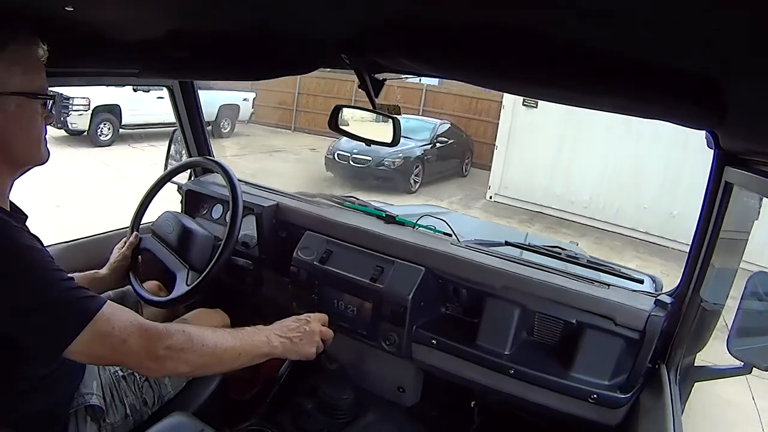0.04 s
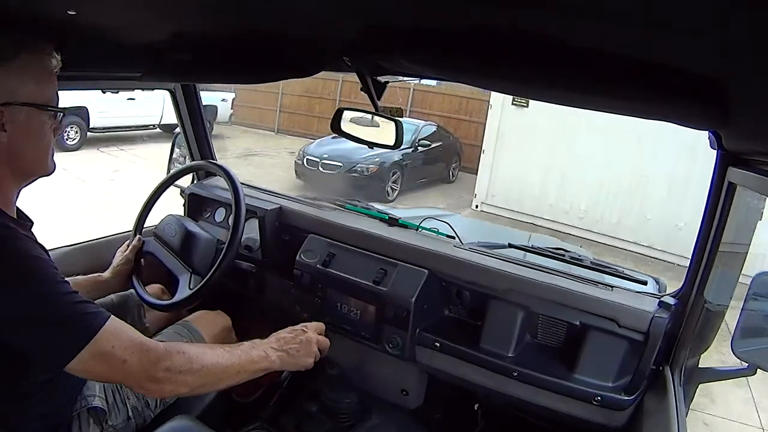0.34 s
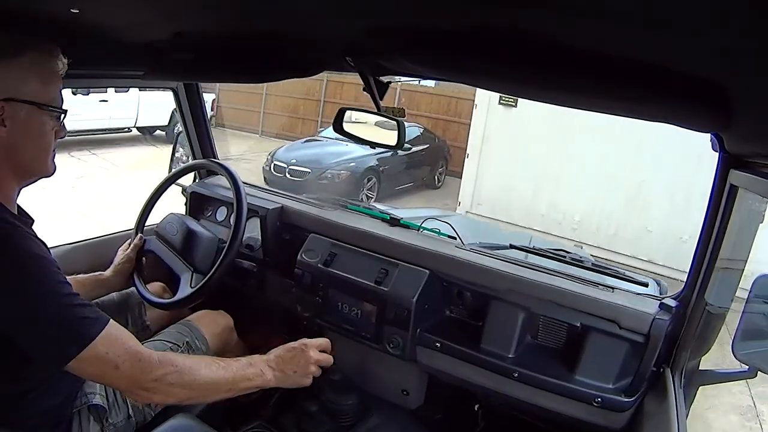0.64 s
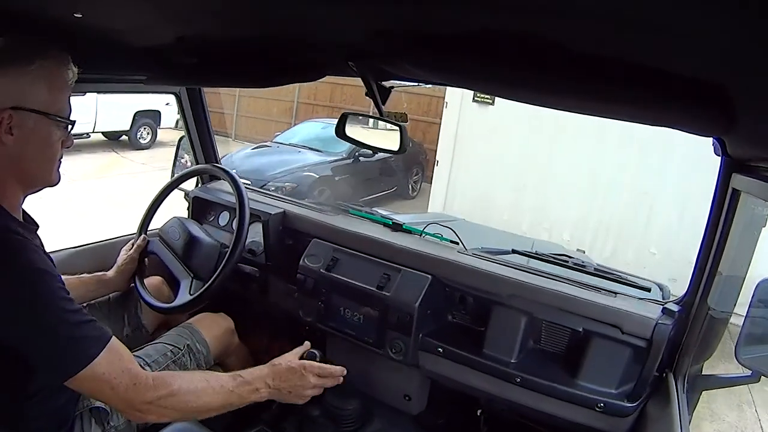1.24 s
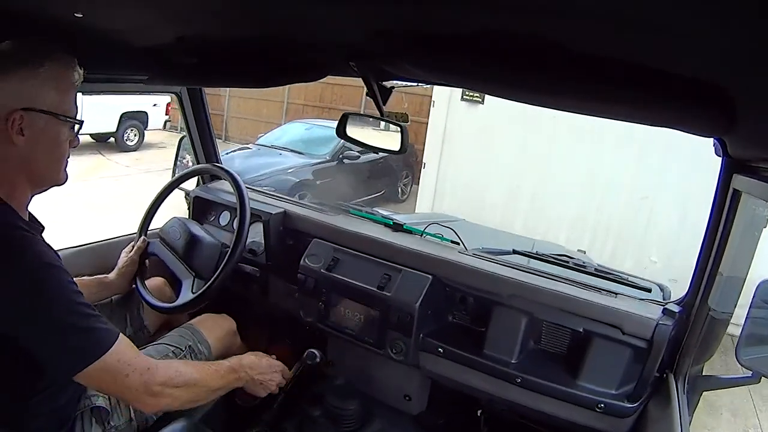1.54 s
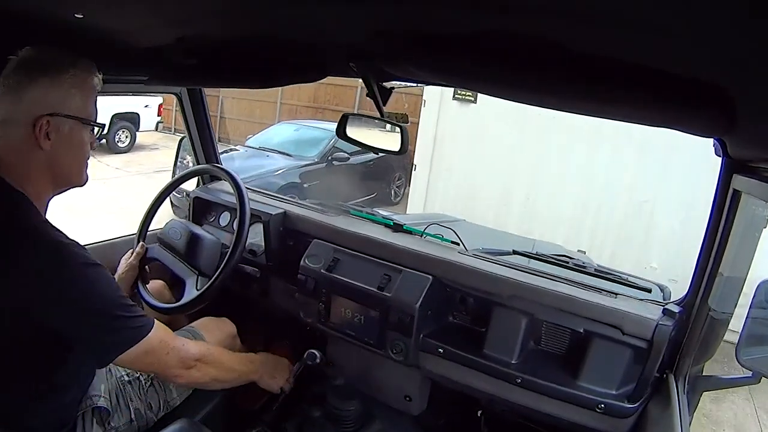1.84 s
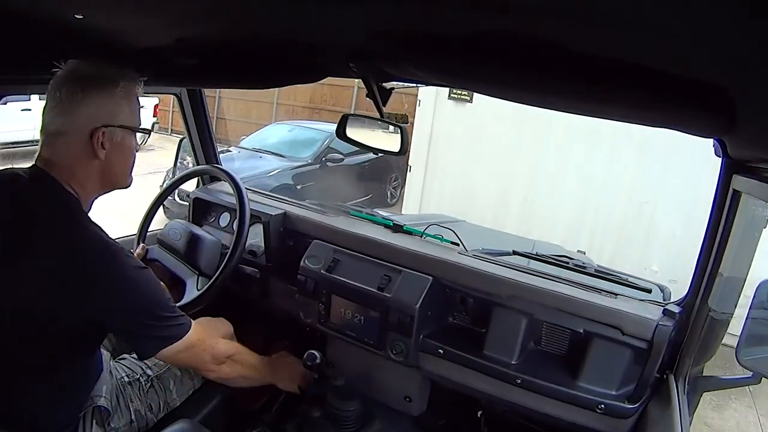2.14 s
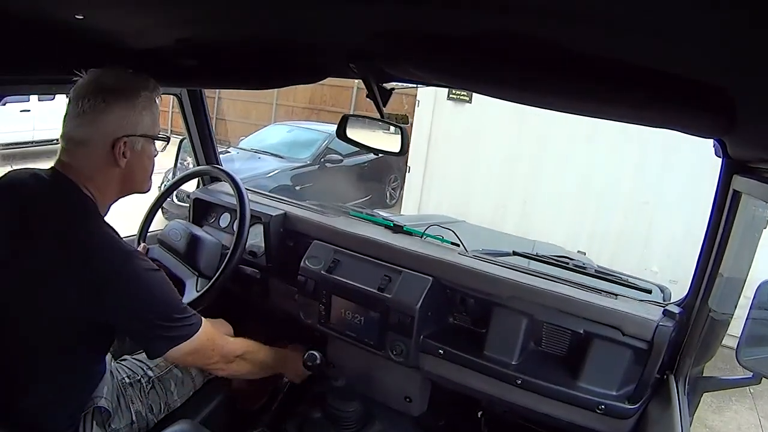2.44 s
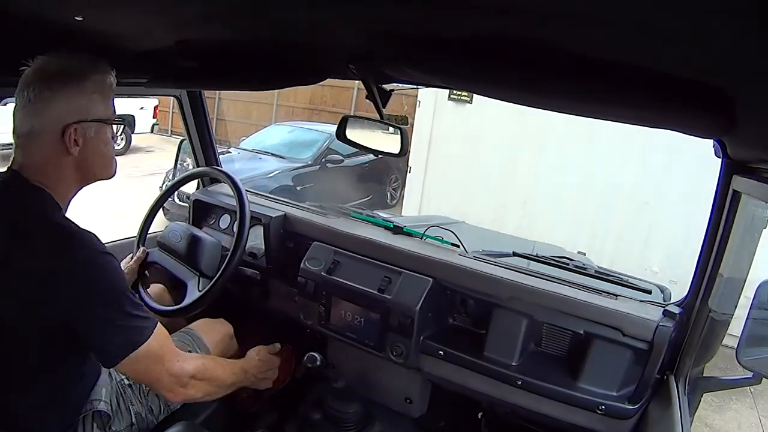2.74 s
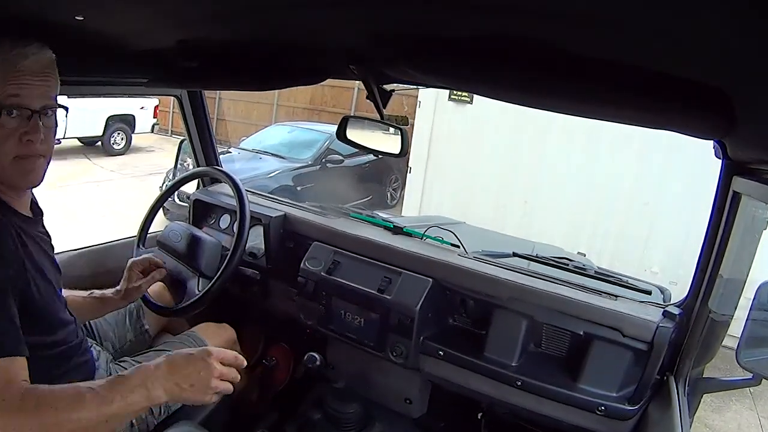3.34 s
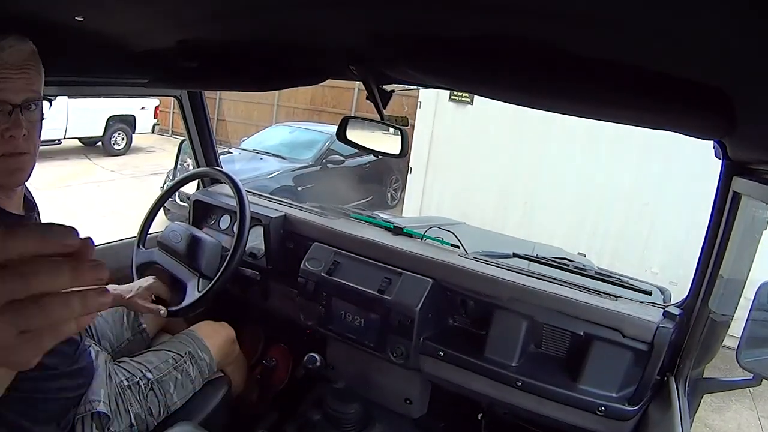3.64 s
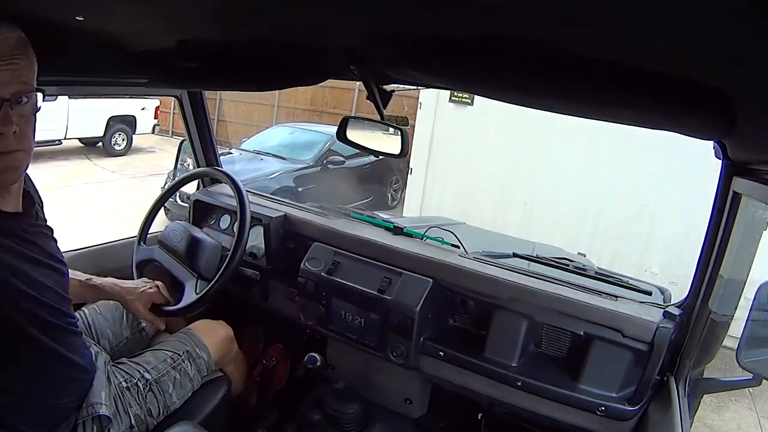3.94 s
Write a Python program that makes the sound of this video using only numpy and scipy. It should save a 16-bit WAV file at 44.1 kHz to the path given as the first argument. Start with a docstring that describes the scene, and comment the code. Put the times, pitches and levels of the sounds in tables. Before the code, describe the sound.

A parking brake ratchets quickly inside a vehicle, after rattling to a stop, engine idling.

```python
"""Inside an off-road vehicle rolling to a stop. First the body rumbles and loose parts rattle, with one
firm clunk at about 0.55 s. As the rumble dies down, the engine's throbbing idle is left over a hiss.
At 2.5 s the parking brake is pulled: the cable scrapes tight and the pawl snaps over six teeth,
ringing the lever and thumping the floor of the small cabin. The idle carries on to the end."""
import sys
import numpy as np
from scipy import signal
from scipy.fft import rfft, irfft
from scipy.io import wavfile
from scipy.ndimage import uniform_filter1d

SR = 44100
rng = np.random.default_rng(int(sys.argv[2]) if len(sys.argv) > 2 else 0)


def digitize_waveform(pressure):
    """Quantize a signal to 16-bit integers and store it at the path in sys.argv[1].

    Rows of a 2-D input are taken as channels; values are limited to [-1, 1].
    """
    field = np.atleast_2d(pressure).T
    bounded = np.clip(field, -1, 1)
    quanta = np.round(bounded * 32767).astype(np.int16)
    wavfile.write(sys.argv[1], SR, quanta)


N = 176400  # 4 s

# one click per ratchet tooth: t/s, steel level/dB, snap trim/dB, floor level/dB
TOOTH_CLICKS = [(2.5508, -1, -1, 2.5), (2.593, 2, -3, 2.5), (2.6318, 1.5, -2, -4), (2.6624, 0.5, -0.5, 0),
                (2.6891, 0, 0, 4), (2.7226, -2.5, 4.5, 4)]
# bright ring of the lever and ratchet plate: f/Hz, level/dB, t60/s
LEVER_MODES = [(1531, 3, 0.037), (1660, 0, 0.026), (1846, -0.5, 0.039), (2000, -9, 0.026),
               (2730, -21, 0.049), (2724, -10.5, 0.059), (3030, -3.5, 0.056), (3240, -3, 0.036),
               (3510, -23, 0.046), (5050, -27, .035), (5700, -22, .04), (6910, -14.5, 0.072),
               (9640, -21.5, 0.029)]
# low ring of the floor bracket: f/Hz, level/dB, t60/s
BRACKET_MODES = [(207, 1, 0.093), (253.6, 1.5, 0.23), (476, -17, 1), (503, -5.5, 0.2), (644, -1, 0.078),
                 (871, -5.5, 0.1)]
# crisp snap of the pawl: f/Hz, level/dB
SNAP_EQ = [(300, -9.5), (750, -7.5), (1150, -10.5), (1600, -0.5), (2400, -5.5), (3100, -0.5), (4000, -13),
           (5000, -5), (6500, -11.5), (8300, -11.5), (9700, -7), (11000, -14)]
# deep thump of the floor, also the boom under the knocks: f/Hz, level/dB
THUMP_EQ = [(30, -5), (70, -12), (120, 12.5), (260, 1.5), (380, -14.5), (700, -6), (1500, -51), (6000, -87)]
LEVER_DB, SNAP_DB, THUMP_DB, BRACKET_DB = -31.5, -33, -39, -45.5
DRAG_LEAD_S, DRAG_DB, REBOUND_LAG_S, REBOUND_DB = 0.0021, -17.5, 0.009, -11
FLOOR_LAG_S, SEAT_LAG_S, SEAT_DB = 0.00715, 0.028, -1


def ratchet():
    """The pawl drags over each crest, snaps down and rebounds; the floor answers just after."""
    steel, floor = np.zeros((2, 2, N))
    lever_phases, bracket_phases = rng.random(len(LEVER_MODES)), rng.random(len(BRACKET_MODES))
    for at, steel_db, snap_db, floor_db in TOOTH_CLICKS:
        for lag, hit_db in ((-DRAG_LEAD_S, DRAG_DB), (0, 0), (REBOUND_LAG_S, REBOUND_DB)):
            snap = amp(SNAP_DB + snap_db) * burst(SNAP_EQ, t60=0.054, attack=0.00026, width_db=-1)
            lever = amp(LEVER_DB) * ring(LEVER_MODES, lever_phases)
            add(steel, at + lag, amp(steel_db + hit_db) * (snap + lever))
        thump = amp(THUMP_DB + floor_db) * burst(THUMP_EQ, t60=0.11, attack=0.0042, width_db=0.5)
        bracket = amp(BRACKET_DB + floor_db) * ring(BRACKET_MODES, bracket_phases)
        add(floor, at + FLOOR_LAG_S, thump + bracket)
    # the bracket rings again as the pawl seats in the last tooth
    seated_at = TOOTH_CLICKS[-1][0] + SEAT_LAG_S
    add(floor, seated_at, amp(BRACKET_DB + SEAT_DB) * ring(BRACKET_MODES, bracket_phases))
    return cabin_reflections(steel) + floor


# swell and fade as the lever takes up the cable: t/s, level/dB
PULL_ENVELOPE = [(2.5, -82.5), (2.525, -57), (2.56, -51), (2.73, -53.5), (2.765, -64), (2.83, -71),
                 (2.9, -92)]
# midrange scrape of the cable: f/Hz, level/dB
CABLE_EQ = [(150, -13), (400, -2), (750, -2.5), (1100, -4), (1600, 0), (2400, -5), (5000, -34),
            (11000, -12)]


def brake_cable():
    """The brake cable scrapes unevenly as it tightens."""
    return noise(CABLE_EQ, size=N) * amp(curve(PULL_ENVELOPE) + 2.6 * wander(rate_hz=90))


# clunks and rattles: t/s, level/dB, clink trim/dB, boom trim/dB, attack/s
BODY_HITS = [(.003, -15.5, 1, 14.5, 0.0046), (.143, -12, 9, 12, 0.0092), (.198, -13, 1, 13.5, 0.0084),
             (.28, -16, 7, 9, 0.017), (.345, -13, 10, 11, 0.015), (.554, -3, 4.5, 3, 0.0024),
             (.565, 2, -10, 0, .002), (0.587, -12, 1, 16.5, 0.0016), (1.06, -12, 6.5, -3.5, 0.01),
             (1.09, -9.5, 1, 8.5, 0.01), (1.16, -10.5, -3, 5, 0.0056), (1.233, -16, 4, 9, 0.0081),
             (2.447, -26, 13, 4, 0.0018), (2.508, -14.5, -2, -10, 0.0016)]
# dull note of a panel: f/Hz, level/dB
PANEL_EQ = [(100, -18), (300, -16), (480, -5), (690, 6.5), (830, 5.5), (1100, -16), (1600, -21),
            (3000, -20), (6000, -57), (11000, -60)]
# metallic clink on top: f/Hz, level/dB
CLINK_EQ = [(300, -36), (1100, -19), (1550, 7.5), (2100, -9.5), (3000, -8), (4000, -23), (5200, -9.5),
            (7000, -31), (11000, -40)]
PANEL_DB, CLINK_DB, BOOM_DB = -34.5, -38.5, -36
DULL_ABOVE_HZ, DULL_PER_OCTAVE = 1460, 0.66  # dB of treble lost per octave for each dB less force


def body_knocks():
    """Loose parts knock: a panel note, a boom of the body and a clink that is duller for weak blows."""
    out = np.zeros((2, N))
    for at, db, clink_db, boom_db, attack in BODY_HITS:
        tilt = DULL_PER_OCTAVE * db
        tilted_eq = [(hz, level + tilt * max(np.log2(hz / DULL_ABOVE_HZ), 0)) for hz, level in CLINK_EQ]
        panel = amp(PANEL_DB) * burst(PANEL_EQ, t60=0.09, attack=attack, width_db=-4)
        clink = amp(CLINK_DB + clink_db) * burst(tilted_eq, t60=0.11, attack=attack, width_db=-4)
        boom = amp(BOOM_DB + boom_db) * burst(THUMP_EQ, t60=0.18, attack=attack, width_db=0)
        add(out, at, amp(db) * (panel + clink + boom))
    return out


# partials of the idle: multiples of the four-stroke cycle rate
IDLE_ORDERS = (7, 8, 11, 16, 18, 22, 32)
# mix of those partials: level/dB
IDLE_LEVELS = (2.5, 0.5, -11, -13, -3.5, -9, -14.5)
CYCLE_HZ, IDLE_DB, SPEED_DRIFT = 8.32, -51.5, 0.0059


def engine_idle():
    """The firing note beats against its neighbour once every cycle, which makes the throb."""
    cycles = np.cumsum(CYCLE_HZ * (1 + SPEED_DRIFT * wander(rate_hz=3.004))) / SR
    partials = (amp(db + 1.4 * wander(rate_hz=6.97)) * np.sin(2 * np.pi * (order * cycles + rng.random()))
                for order, db in zip(IDLE_ORDERS, IDLE_LEVELS))
    return amp(IDLE_DB) * sum(partials)


# fader ride as the wheels slow and stop: t/s, bass level/dB, drone level/dB
ROLL_ENVELOPE = [(0, -36.5, -45.5), (.2, -31.5, -41), (.42, -37, -45.5), (.75, -47.5, -46.5),
                 (1.1, -40.5, -50.5), (1.35, -44, -51), (1.55, -46.5, -51.5), (1.9, -51.5, -56),
                 (2.5, -52.5, -53.5), (3.05, -55.5, -53.5), (3.65, -53, -55), (4, -52.5, -53)]
# deep bass of the body: f/Hz, level/dB
BASS_EQ = [(15, -17), (28, -1), (39, -20), (55, 5), (75, -3), (92, -3), (125, -5.5), (170, -19), (400, -87)]
# low drone of the body: f/Hz, level/dB
DRONE_EQ = [(50, -38), (90, -3.5), (140, 1), (190, -1.5), (260, -6), (330, -23.5), (420, -21), (900, -70)]
# bed of mechanical hiss: f/Hz, level/dB
HISS_EQ = [(210, -30), (350, 5.5), (371, -8.5), (454, -2), (495, 0), (572, -3.5), (651, -1.5), (730, -6),
           (1260, -7.5), (1690, 1), (1870, -6), (2320, -9.5), (9800, -14), (11000, -15.5), (14300, -118),
           (22000, -120)]
HISS_DB, HISS_FOLLOW, HISS_LOW_CUT_HZ = -59.5, 0.32, 300


def body_rumble():
    """Bass and drone of the body die down with the speed; a mechanical hiss partly follows the drone."""
    bass_db, drone_db = curve(ROLL_ENVELOPE, column=1), curve(ROLL_ENVELOPE, column=2)
    low_cut = signal.butter(2, HISS_LOW_CUT_HZ, "high", fs=SR, output="sos")
    hiss = signal.sosfilt(low_cut, noise(HISS_EQ, size=N))
    bass = noise(BASS_EQ, size=N) * amp(bass_db)
    drone = noise(DRONE_EQ, size=N) * amp(drone_db + wander(rate_hz=24.89))
    hiss_db = HISS_DB + HISS_FOLLOW * (drone_db - np.median(drone_db)) + 0.46 * wander(rate_hz=11)
    return bass + drone + hiss * amp(hiss_db)


def cabin_reflections(direct, t60=0.1, wet_db=-7.5):
    """Direct sound plus the short, dense reflections of glass and trim."""
    echo = rng.standard_normal((2, SR // 2)) * decay(t60) * (1 - decay(0.014))
    echo /= np.sqrt(np.sum(echo ** 2, axis=1, keepdims=True))
    return direct + amp(wet_db) * signal.fftconvolve(direct, echo, axes=1)[:, :N]


def ring(modes, phases, attack=0.0004, scatter_db=2, detune=0.005, left_lag_s=0.0001):
    """Struck modes, a little different at each blow; they reach the left side later."""
    t = np.maximum(np.arange(SR // 2) / SR - np.array([[left_lag_s], [0]]), 0)
    scatter = rng.standard_normal((len(modes), 2))
    tone = 0
    for (hz, db, t60), (louder, sharper), phase in zip(modes, scatter, phases):
        cycles = hz * (1 + detune * sharper) * t + phase
        tone += amp(db + scatter_db * louder) * decay(t60) * np.sin(2 * np.pi * cycles)
    return tone * (1 - np.exp(-t / attack))


def burst(eq, t60, attack, width_db):
    """Dense ringing of a struck part: coloured noise that rises and dies."""
    t = np.arange(SR // 2) / SR
    return noise(eq, size=SR // 2, width_db=width_db) * decay(t60) * (1 - np.exp(-t / attack))


# stereo width in the cabin: f/Hz, side minus mid level/dB
STEREO_WIDTH = [(60, -11), (110, -7.5), (190, -4.5), (290, 11.5), (600, 3), (1080, 7.5), (1900, 1),
                (3400, 3.5), (6100, -2.5), (10900, -6)]


def noise(eq, size, width_db=0):
    """Coloured stereo noise with the cabin's width; the mid signal has rms 1."""
    mid, side = rfft(rng.standard_normal((2, size))) * eq_gains(eq, size)
    side = side * eq_gains(STEREO_WIDTH, size) * amp(width_db)
    return irfft(np.array([mid + side, mid - side]), size) / irfft(mid, size).std()


def eq_gains(eq, size):
    """Gain of an EQ curve at each frequency bin."""
    hz, db = np.array(eq, float).T
    return amp(np.interp(np.log(np.fft.rfftfreq(size, 1 / SR) + 1), np.log(hz), db))


def curve(table, column=1):
    """A column of a table, joined by straight lines in time."""
    rows = np.array(table, float)
    return np.interp(np.arange(N) / SR, rows[:, 0], rows[:, column])


def wander(rate_hz):
    """Smooth random drift with a spread of 1."""
    hold = max(int(SR / rate_hz), 2)
    steps = rng.standard_normal(512)[np.arange(N) // hold % 512]
    drift = uniform_filter1d(uniform_filter1d(steps, hold), hold)
    return drift / drift.std()


def decay(t60):
    """Half a second of exponential decay, falling 60 dB in t60 seconds."""
    return np.exp(-np.log(1000) * np.arange(SR // 2) / SR / t60)


def amp(db):
    """Decibels to amplitude."""
    return 10 ** (np.asarray(db) / 20)


def add(out, at, sound):
    """Mix a sound in at a time in seconds."""
    start = int(at * SR)
    out[:, start:start + sound.shape[1]] += sound[:, :N - start]


def scene():
    """Everything heard in the cabin."""
    return body_rumble() + engine_idle() + body_knocks() + brake_cable() + ratchet()


# pan across the spectrum: f/Hz, left minus right level/dB
PAN_CURVE = [(60, 1), (150, -2), (300, -3), (700, 1.5), (1500, 0), (11000, -0.2)]
HIGH_CUT_HZ = 11150


def record(dry):
    """The low mids lean to the right and the top is cut steeply."""
    lean = np.sqrt(eq_gains(PAN_CURVE, N))
    panned = irfft(rfft(dry) * np.array([lean, 1 / lean]), N)
    return signal.sosfilt(signal.ellip(12, 0.1, 80, HIGH_CUT_HZ, fs=SR, output="sos"), panned)


dry = scene()
out = record(dry)
digitize_waveform(out)
```